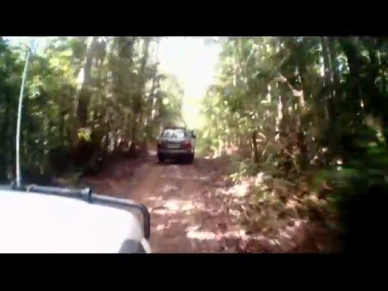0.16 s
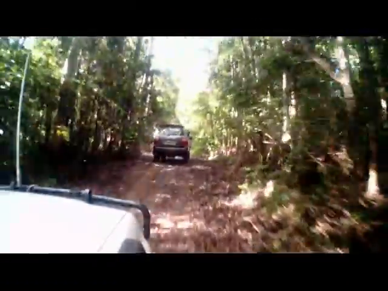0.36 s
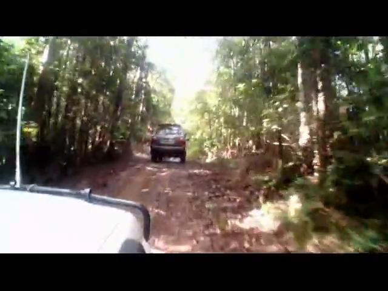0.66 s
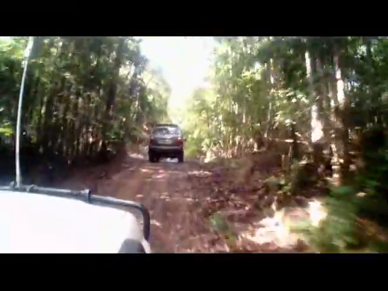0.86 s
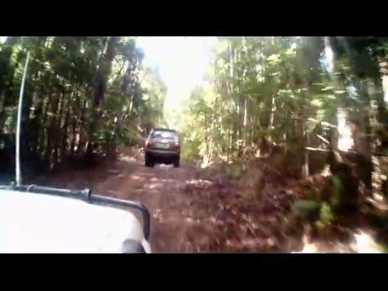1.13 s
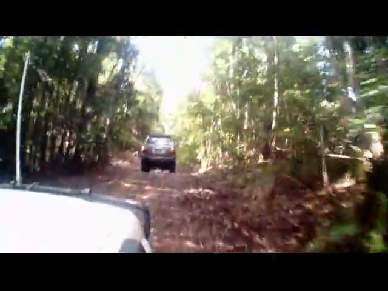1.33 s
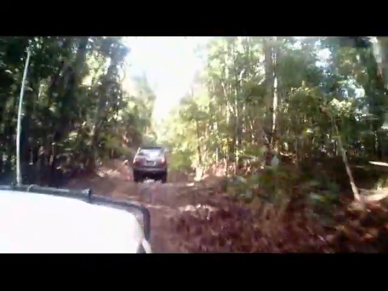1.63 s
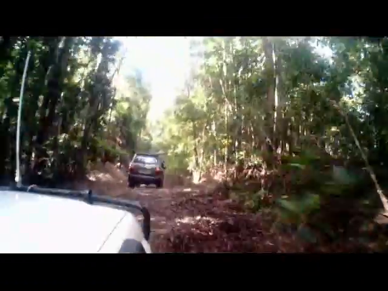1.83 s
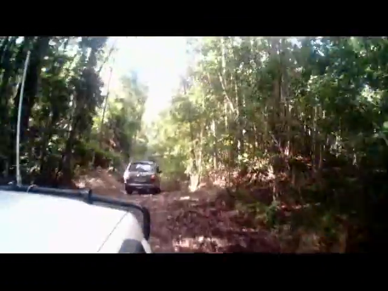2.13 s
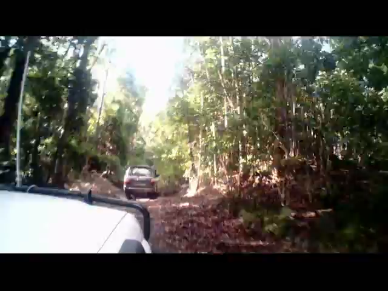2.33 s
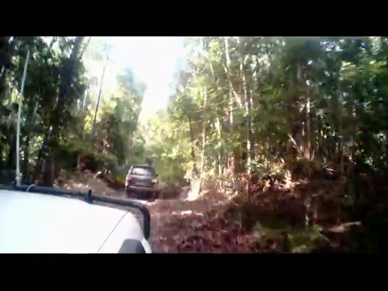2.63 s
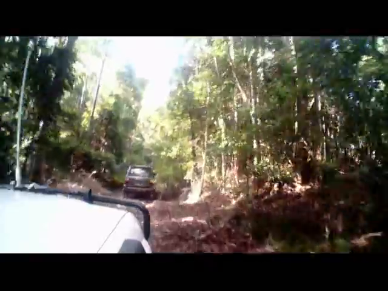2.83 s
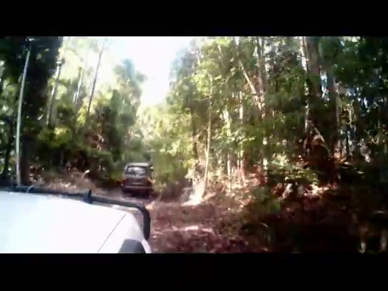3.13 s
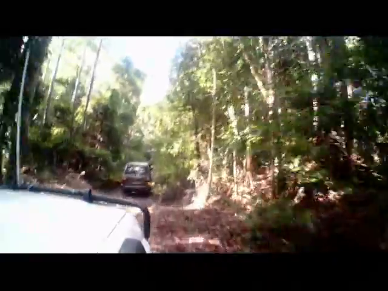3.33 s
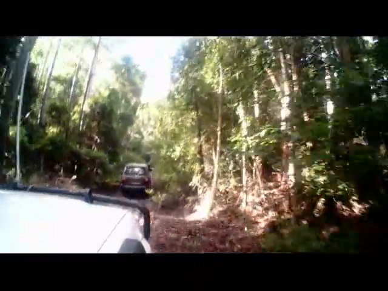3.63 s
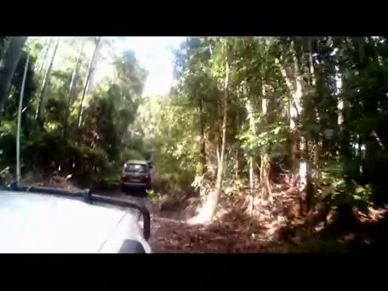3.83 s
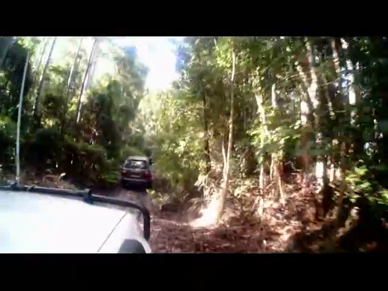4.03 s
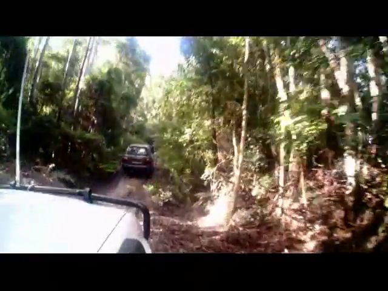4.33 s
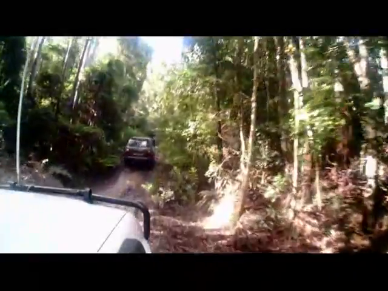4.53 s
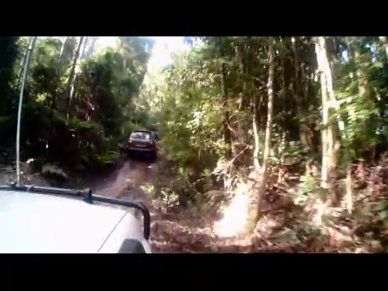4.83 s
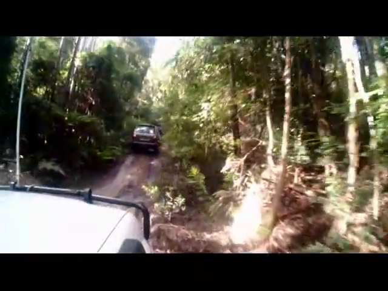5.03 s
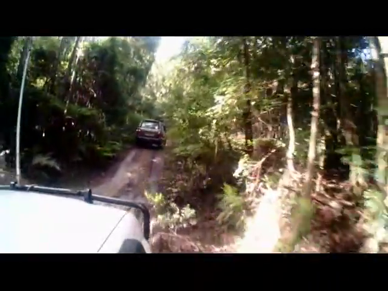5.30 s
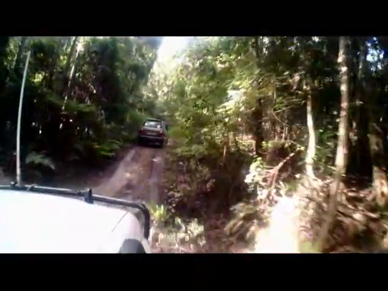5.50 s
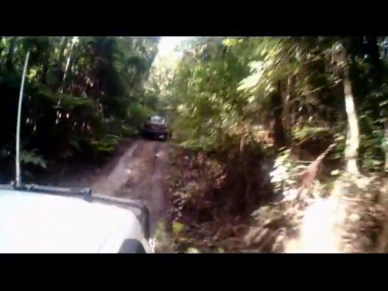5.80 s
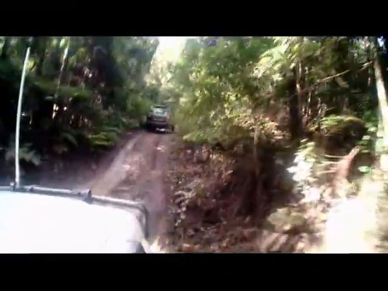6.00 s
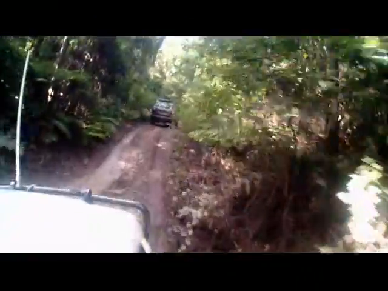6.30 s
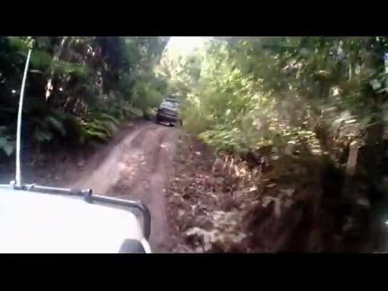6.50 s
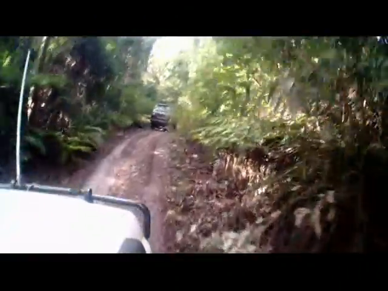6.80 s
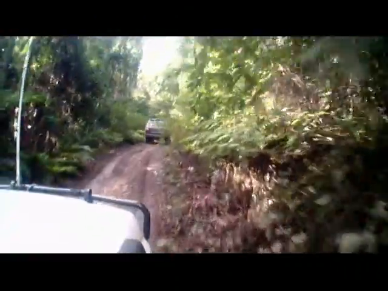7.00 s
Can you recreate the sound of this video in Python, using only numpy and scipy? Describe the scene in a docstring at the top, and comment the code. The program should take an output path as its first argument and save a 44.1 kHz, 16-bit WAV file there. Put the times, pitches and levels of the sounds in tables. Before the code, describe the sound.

Heard inside the cab of an off-road vehicle on a forest track, a low, booming engine hum sinks slowly while the tyres rumble underneath. Midway comes a cluster of clanks with a heavy thud, then a faint scrape of branches and another sharp metallic knock. The engine climbs back up under load, and a quick run of dry plastic taps rattles very close to the microphone to finish.

```python
"""An engine drones close ahead, heard from a camera microphone in the cab of a four-wheel drive climbing
a forest dirt track. It eases off, then pulls until its firing harmonics boom in the cab's air modes.
Below, tyres rumble and crunch on grit; ruts make loose metal clank and the body thud. Outside, leaves
and branches brush past, and near the end the plastic mount chatters right at the microphone."""
import sys
import numpy as np
from scipy.fft import rfft, irfft, next_fast_len
from scipy.io import wavfile
from scipy.ndimage import uniform_filter1d, map_coordinates

SR = 44100
rng = np.random.default_rng(int(sys.argv[2]) if len(sys.argv) > 2 else 0)


def waveform_to_disk(signal):
    """Save audio, clipped to [-1, 1], as 16-bit WAV at the path in sys.argv[1]."""
    frames = np.transpose(np.atleast_2d(signal))
    scaled = np.clip(frames, -1, 1) * 32767
    samples = np.round(scaled).astype(np.int16)
    wavfile.write(sys.argv[1], SR, samples)


N = 315315

# engine speed as firing rate: (t/s, f/Hz)
FIRING_RATE = [(0, 80.84), (.3, 78.57), (.6, 76.2), (1.1, 71.76), (1.35, 71.03), (1.6, 68.06),
               (2.05, 60.34), (2.5, 58.69), (2.9, 58.78), (3.25, 63.25), (3.65, 65.48), (4.4, 62.89),
               (5.1, 59.9), (5.7, 67.4), (5.95, 70.23), (6.13, 76.37), (6.2, 78.53), (6.5, 78.83),
               (7.15, 78.93)]
# engine load, which drives clatter, hiss, boom and the tyres' grip on the grit: (t/s, level/dB)
LOAD = [(0, 2), (.35, 2), (1.8, -0.8), (3.3, 0), (4.3, 1.64), (5.2, 1.73), (5.65, 2), (6.1, 2.5),
        (7.15, 2.5)]
# strength of the exhaust drone: (t/s, level/dB)
DRONE_LEVEL = [(0, -45), (.3, -47), (.6, -43.5), (1.1, -41.5), (1.55, -40), (1.9, -43.5), (2.2, -45.5),
               (2.5, -46), (2.8, -40), (3, -42.5), (3.2, -42.5), (3.6, -41.5), (4.1, -50.5), (5.05, -53),
               (5.5, -44), (5.95, -42.5), (6.21, -37), (6.26, -44.5), (6.29, -39.5), (6.57, -33),
               (6.72, -39), (6.92, -38), (7.15, -39)]
# exhaust harmonics; unequal cylinders add half orders: (multiple of the firing rate, level/dB)
EXHAUST_ORDERS = [(1, -3.5), (2, -0.5), (2.5, -10), (3, 1.5), (4, -16.5), (5.5, -15)]
# the cab's air modes, as heard at the microphone: (f/Hz, gain/dB)
CAB_RESPONSE = [(60, -12.5), (78, -10.5), (100, -5), (118, 1), (128, 2), (140, 4), (152, -11), (162, -8),
                (177, 6), (186, -6.5), (205, -13.5), (224, -12.5), (238, 9), (258, -2.5), (320, -13),
                (378, -4), (400, -11.5), (440, -22)]
# engine bay resonances: (f/Hz, width/Hz, gain/dB)
BAY_MODES = [(324, 18, -7.5), (466.3, 52.4, 2), (805, 32, -5), (903, 120, -6), (1065.5, 62.5, 4),
             (1120, 64, 1.5), (1330, 43, -23), (1740, 750, -17), (2097, 110, -11)]
# upper harmonics that sing in the bay: (multiple of the firing rate, level/dB)
SINGING_ORDERS = [(14, -23), (15, -23), (16, -24), (17, -24), (18, -20), (19, -24)]
# valve hiss spectrum: (f/Hz, level/dB)
HISS_SPECTRUM = [(900, -36), (1500, -3), (1900, -15.5), (2300, -4), (2800, -1), (3200, -1.5), (3650, -0.5),
                 (4170, -1), (4530, -4.5), (5000, -7.5), (5560, -13.5), (6900, -21), (7800, -57.5)]
# intake whistle, following the throttle: (t/s, level/dB)
INTAKE_LEVEL = [(0, -73), (.8, -68.5), (1.4, -72), (1.8, -76), (3.4, -76), (4.2, -68.5), (4.7, -64),
                (5.6, -64.5), (6.1, -65), (7.15, -65)]
# the intake's two whistling resonances: (f/Hz, level/dB)
INTAKE_SPECTRUM = [(2000, -42), (2520, -8.5), (2740, 1.5), (2980, -14.5), (3500, -28), (3900, -16),
                   (4150, -7.5), (4450, -18), (5200, -40.5)]
# alternator whine: (t/s, level/dB)
WHINE_LEVEL = [(0, -71.5), (.6, -71.5), (1.3, -71), (1.7, -73), (2.05, -72), (2.3, -81), (2.8, -73),
               (3.3, -77), (7.15, -72.5)]

# tyre rumble, following the roughness of the track: (t/s, level/dB)
RUMBLE_LEVEL = [(0, -29.5), (.4, -36), (.77, -30.5), (.96, -38), (1.21, -34), (1.33, -42.5), (1.5, -39.5),
                (1.9, -39.5), (2.08, -31), (2.4, -36.5), (2.89, -32.5), (3.4, -37), (3.9, -35.5),
                (4.6, -38), (5.3, -36), (5.65, -45), (6.58, -40.5), (7, -27.5), (7.15, -37.5)]
# its spectrum under the floor: (f/Hz, level/dB)
RUMBLE_SPECTRUM = [(12, -34), (22, -5), (32, 9), (38, 6), (45, -3), (53, -7), (63, -36.5), (100, -38),
                   (200, -78)]
# the cab's boom around the microphone: (f/Hz, level/dB)
BOOM_SPECTRUM = [(60, -24.5), (100, -13), (118, 0), (145, -3.5), (172, 0.5), (205, -3), (228, -3.5),
                 (252, -14.5), (272, -13), (330, -16.5), (480, -25.5), (600, -24.5), (1200, -64.5)]
# blows from ruts: (t/s, clank level/dB, thud level/dB, thud softness/dB lost per octave)
RUT_BLOWS = [ (3.519, -29.5, -29.5, 2), (3.546, -31, -31, 6), (3.575, -52, -27, 8), (3.635, -56, -23, 7),
             (3.7305, -33, -27, -2), (3.7405, -35, -17, 6), (3.7483, -36, -8.5, 17.5), (3.803, -33, -55, 2),
             (4.141, -31.5, -52, 6), (4.512, -61, -57, -5), (4.844, -33, -49, 2.5), (5.162, -16, -36.5, 9),
             (5.174, -29.5, -21.5, 1.5), (5.216, -19, -13.5, 2), (5.233, -34, -23, -1.5),
             (5.364, -34, -49, 6), (5.398, -32.5, -58, 5), (5.952, -36.5, -31, 3),
             (6.185, -30.5, -34, -1.5), (6.61, -28.5, -41, 4.5)]
# ring of loose metal: (f/Hz, level/dB, t60/s)
METAL_MODES = [(792, -19, 0.26), (881, -18, 0.13), (1126, -1.5, 0.043), (1130.5, 4, 0.049),
               (1386, -11.5, 0.036), (1530, -20.5, 0.054), (1847, -20.5, 0.031), (2050, -24.5, 0.098),
               (2460, -25.5, 0.029), (3700, -26.5, 0.026)]
# ring of the body shell: (f/Hz, level/dB, t60/s)
SHELL_MODES = [(127.1, -5.5, 0.16), (184.2, 1, 0.075), (225, -4.5, 0.14), (313.6, -2.5, 0.068),
               (399, -5, 0.077), (444.6, -6, 0.11), (793, -22.5, 0.08), (913, -6.5, 0.079)]
# rattle of small fittings: (f/Hz, level/dB)
FITTINGS_SPECTRUM = [(900, -28), (1250, 3), (1600, 4), (2100, -7.5), (2400, -14), (2750, -7.5), (3300, -27),
                     (4200, -17.5), (5000, -36), (7000, -55)]
# the camera mount's run of fading taps: (t/s, level/dB)
MOUNT_TAPS = [(6.646, -10), (6.705, -6.5), (6.7649, -8), (6.8271, -8), (6.8881, -11), (6.95, -14),
              (7.011, -17), (7.0723, -13), (7.133, -14.5)]
# ring of the plastic mount: (f/Hz, level/dB, t60/s)
MOUNT_MODES = [(170.2, -18, 0.1), (202, 2, 0.026), (496.7, -12, 0.02), (640, -16, 0.012),
               (875, -20.5, 0.03), (1080, -17.5, 0.025), (1550, -42, 0.0055), (1990, -23, 0.015),
               (3870, -36.5, 0.021)]
# click of each tap: (f/Hz, level/dB)
CLICK_SPECTRUM = [(250, -8.5), (500, 13.5), (1200, 0), (1700, -10), (2100, -11.5), (2500, -12.5),
                  (4100, -21), (5200, -23.5), (7000, -39)]

# grit under the tyres: (f/Hz, level/dB)
GRIT_SPECTRUM = [(500, -8.0), (900, 9.5), (1400, 5.0), (1750, -23.5), (2200, -13.5), (3000, -19.5),
                 (4500, -26.0), (7000, -43.0)]
# patches of loose stones: (t/s, level/dB)
STONE_PATCHES = [(3.55, -46), (4.67, -50), (5.39, -53), (6.15, -52)]
# twigs snap and stones tick: (t/s, level/dB, f/Hz)
SNAPS = [(2.83, -47, 2660), (2.866, -50.5, 4360), (3.518, -56, 1870), (3.546, -44, 1842),
         (3.638, -48, 2000), (4.256, -38, 1450), (4.545, -42, 1649), (4.647, -46, 1510), (5.470, -59, 4540)]
# branches along the body: (t/s, level/dB, half length/s)
BRANCH_SCRAPES = [(4.233, -67, .06), (4.664, -55, 0.026), (5.365, -55, .02)]
# their spectrum: (f/Hz, level/dB)
BRANCH_SPECTRUM = [(1000, -19), (1500, 3.5), (2100, -1.5), (2900, -6), (4200, -16.5), (7000, -32)]
# rustle of dry leaves: (t/s, level/dB)
LEAF_LEVEL = [(3.9, -78), (4.27, -49.5), (4.42, -57), (4.62, -61), (4.9, -85)]
# its spectrum: (f/Hz, level/dB)
LEAF_SPECTRUM = [(500, -4), (900, 4), (1500, -15), (2300, -6.5), (3000, -18), (5000, -24), (7000, -45.5)]
# bands the bulkhead swallows: (f/Hz, width/Hz, gain/dB)
BULKHEAD_DIPS = [(80, 110, -20), (580, 37, -12), (1265, 210, -7), (2285, 600, -6.5)]
# the camera's electrical buzz, all treble: (f/Hz, level/dB)
BUZZ_SPECTRUM = [(2500, -28.5), (4200, 4), (5200, 1.5), (6900, -11.5), (7800, -34.5)]

CLATTER_DB, HISS_DB, BOOM_DB, GRIT_DB = -45.5, -68.5, -41, -63  # at medium load
HISS_GROWTH, BOOM_GROWTH, GRIT_GROWTH = 0.57, 0.8, 5.3  # dB per dB of load
BRIGHTENING = 2.1  # dB per dB of load, for each order above the fourth
REBOUND_S, REBOUND_LOSS_DB = .033, 16  # every blow falls back once, more softly
TIME = np.arange(N) / SR


def engine():
    """Just ahead of the cab: drone, clatter, valve hiss, intake whistle and a faint alternator whine."""
    firing_hz, load_db = curve(FIRING_RATE), curve(LOAD)
    firings = np.cumsum(firing_hz * (1 + 0.0032 * wobble(14))) / SR
    beat_db = 0.5 * np.cos(2 * np.pi * firings)
    clatter = bay_clatter(firings, firing_hz, beat_db, load_db, sag=0.0099)
    valve_noise = amp(beat_db + wobble(60)) * rng.standard_normal(N)
    hiss = amp(HISS_DB + HISS_GROWTH * load_db) * coloured(valve_noise, HISS_SPECTRUM)
    intake_air = amp(beat_db) * rng.standard_normal(N)
    intake = amp(curve(INTAKE_LEVEL)) * coloured(intake_air, INTAKE_SPECTRUM)
    whine = alternator(firings, order=35.3)
    return drone(firings, firing_hz, load_db, waver_db=0.4) + clatter + hiss + intake + whine


def drone(firings, firing_hz, load_db, waver_db):
    """Low firing harmonics fill the cab as nearly clean tones, each swelling as it crosses an air mode."""
    drone_db, out = curve(DRONE_LEVEL), np.zeros(N)
    for order, order_db in EXHAUST_ORDERS:
        cab_db = np.interp(order * firing_hz, *np.transpose(CAB_RESPONSE))
        db = drone_db + order_db + cab_db + waver_db * wobble(18)
        db += BRIGHTENING * max(order - 4, 0) * load_db
        out += np.sqrt(2) * amp(db) * np.sin(2 * np.pi * (order * firings + rng.random()))
    return out


def bay_clatter(firings, firing_hz, beat_db, load_db, sag):
    """Rattle, upper harmonics and firing pulses ring in the engine bay, muffled by the bulkhead."""
    rattle = unit(amp(beat_db + wobble(45)) * rng.standard_normal(N))
    drive = rattle + singing(firings, firing_hz, centre_hz=1115, width_hz=120, waver=0.5)
    drive += 0.27 * combustion(firings, cylinder_db=2.5, scatter_db=5.0)
    # off load the clatter rings a little lower
    slack = np.clip(load_db / load_db.min(), 0, 1)
    slack_modes = [(hz * (1 - sag), width, db) for hz, width, db in BAY_MODES]
    ring = (1 - slack) * resonate(drive, BAY_MODES) + slack * resonate(drive, slack_modes)
    return lowpass(bulkhead(amp(CLATTER_DB + load_db) * ring), cutoff_hz=1550, poles=3)


def singing(firings, firing_hz, centre_hz, width_hz, waver):
    """Upper harmonics sing out as they cross the bay's main resonance, each wavering on its own."""
    out = np.zeros(N)
    for order, db in SINGING_ORDERS:
        nearness = bell(order * firing_hz, centre_hz, width_hz)
        unsteady = 1 + waver * (wobble(22) + 1j * wobble(22))
        tone = np.exp(2j * np.pi * (order * firings + rng.random()))
        out += amp(db) * nearness * np.real(unsteady * tone)
    return out


def combustion(firings, cylinder_db, scatter_db):
    """One pulse per firing; the four cylinders differ in strength."""
    at = np.flatnonzero(np.diff(np.floor(firings)))
    cylinder = np.resize(rng.standard_normal(4), len(at))
    pulses = np.zeros(N)
    pulses[at] = amp(cylinder_db * cylinder + scatter_db * rng.standard_normal(len(at)))
    return unit(pulses)


def alternator(firings, order):
    """The alternator's fan whines as a narrow band of noise that follows the shaft."""
    flutter = wobble(190) + 1j * wobble(190)
    whine = np.real(flutter * np.exp(2j * np.pi * order * firings))
    return amp(curve(WHINE_LEVEL) - 0.5) * unit(whine)


def road(jolts_per_s, hum_hz, hum_db):
    """Tyres shake the body from below; the cab booms around the microphone and one panel hums."""
    sway = coloured(rng.standard_normal(N), RUMBLE_SPECTRUM)
    # the heavy body keeps swinging, so the rumble is fairly even
    sway_power = np.abs(uniform_filter1d(sway ** 2, size=5000))
    sway = unit(sway / np.sqrt(sway_power + 0.69))
    boom_db = BOOM_DB + BOOM_GROWTH * curve(LOAD) + 0.87 * wobble(jolts_per_s)
    boom = amp(boom_db) * coloured(rng.standard_normal(N), BOOM_SPECTRUM)
    hum_phase = 2 * np.pi * hum_hz * TIME + 0.63 * wobble(22)
    hum = amp(hum_db + 1.8 * wobble(21)) * np.sin(hum_phase)
    rumble_db = curve(RUMBLE_LEVEL) - 1.5 * wobble(jolts_per_s)  # swells and sinks from bump to bump
    return amp(rumble_db) * sway + boom + hum


def knocks(crack_db, crack_t60):
    """Each rut clanks loose metal with a brief crack and thuds through the body shell, then rebounds."""
    rings, cracks, t = np.zeros(N), np.zeros(N), np.arange(SR // 3) / SR
    rebounds = [(s + REBOUND_S, clank_db - REBOUND_LOSS_DB, thud_db - REBOUND_LOSS_DB, softness)
                for s, clank_db, thud_db, softness in RUT_BLOWS]
    for s, clank_db, thud_db, softness in RUT_BLOWS + rebounds:
        add(rings, s, amp(clank_db) * strike(METAL_MODES, attack_s=0.0027, scatter_db=1.5))
        # softer blows reach mainly the lowest modes of the shell
        shell = [(hz, db - softness * np.log2(hz / SHELL_MODES[0][0]), t60)
                 for hz, db, t60 in SHELL_MODES]
        add(rings, s, amp(thud_db) * strike(shell, attack_s=0.0026, scatter_db=1.0))
        add(cracks, s, amp(clank_db + crack_db - 60 * t / crack_t60) * rng.standard_normal(len(t)))
    return rings + lowpass(cracks, cutoff_hz=4000, poles=10)


def mount(click_db, click_t60):
    """Right at the microphone, each tap is a short, damped swing of the camera with a dry plastic click."""
    swings, clicks, t = np.zeros(N), np.zeros(N), np.arange(SR // 10) / SR
    for s, db in MOUNT_TAPS:
        add(swings, s, amp(db) * strike(MOUNT_MODES, attack_s=0.002, scatter_db=1.0))
        add(clicks, s, amp(db + click_db - 60 * t / click_t60) * (1 - np.exp(-t / 0.0015)))
    taps = swings + clicks * coloured(rng.standard_normal(N), CLICK_SPECTRUM)
    # the light mount carries no deep bass
    return filtered(taps, lambda hz: 1 / np.sqrt(1 + (150 / (hz + 1)) ** 8))


def fittings(shake_db, rise_s):
    """Every thud shakes small loose fittings into a brief rattle that swells and dies."""
    shake, age = np.zeros(N), np.arange(SR // 4) / SR / rise_s
    for s, _, thud_db, softness in RUT_BLOWS:
        add(shake, s, amp(thud_db - softness + shake_db) * age * np.exp(1 - age))
    return shake * coloured(grains(per_s=1200), FITTINGS_SPECTRUM)


def grit(patch_half_s):
    """Down at the tyres grit crunches in clumps, more on stony patches; twigs snap and stones tick."""
    patches = sum(amp(db) * bell(TIME, s, patch_half_s) for s, db in STONE_PATCHES)
    crunch = amp(GRIT_DB + GRIT_GROWTH * curve(LOAD)) + patches
    clumps = grains(per_s=1500) * amp(1.9 * wobble(35))
    out = crunch * coloured(clumps, GRIT_SPECTRUM)
    for s, db, hz in SNAPS:
        modes = [(hz, 0, .015), (0.98 * hz, -10, .01)]
        add(out, s, amp(db) * strike(modes, attack_s=0.00046, scatter_db=3.5))
    return out


def branches():
    """Just outside, each branch drags over the paint as a short swell of dense, bright grains."""
    contact = sum(amp(db) * bell(TIME, s, half_s) for s, db, half_s in BRANCH_SCRAPES)
    return contact * coloured(grains(per_s=2500), BRANCH_SPECTRUM)


def leaves(flicker_db):
    """A soft, grainy rustle swells and fades as the vehicle runs through dry leaves."""
    level = amp(curve(LEAF_LEVEL))
    rustle = grains(per_s=4000) * amp(flicker_db * wobble(58))
    return (level - level.min()) * coloured(rustle, LEAF_SPECTRUM)


def buzz(hz, level_db, tick_s, second_tick_db):
    """A faint steady buzz in the camera's electronics: two unequal ticks per cycle."""
    half_cycles = 2 * hz * TIME
    age_s = half_cycles % 1 / (2 * hz)
    ticks = np.exp(-age_s / tick_s) * amp(second_tick_db * (np.floor(half_cycles) % 2))
    return amp(level_db) * coloured(ticks * rng.standard_normal(N), BUZZ_SPECTRUM)


def bulkhead(x):
    """Sounds from outside pass the bulkhead's antiresonances on their way to the microphone."""
    return filtered(x, lambda f: np.prod(
        [1 + (amp(db) - 1) * resonance(f, hz, width) for hz, width, db in BULKHEAD_DIPS], axis=0))


def strike(modes, attack_s, scatter_db):
    """One blow: every mode rings at a slightly new strength and pitch."""
    t = np.arange(SR // 3) / SR
    ring = np.zeros(len(t))
    for hz, db, t60 in modes:
        decay = amp(db + scatter_db * rng.normal() - 60 * t / t60)
        ring += decay * np.sin(2 * np.pi * hz * (1 + 0.0076 * rng.normal()) * t)
    return ring * (1 - np.exp(-t / attack_s))


def grains(per_s):
    """Tiny contacts of random timing and strength."""
    return (rng.random(N) < per_s / SR) * rng.standard_normal(N)


def resonance(f, hz, width):
    """Complex response of one mode, 1 at its centre."""
    return 1j * f * width / (hz * hz - f * f + 1j * f * width)


def resonate(x, modes):
    """x through (f/Hz, width/Hz, gain/dB) resonances, at rms 1."""
    return unit(filtered(x, lambda f: sum(amp(db) * resonance(f, hz, width) for hz, width, db in modes)))


def coloured(x, spectrum):
    """x shaped by (f/Hz, level/dB) points, at rms 1."""
    f, db = np.transpose(spectrum)
    return unit(filtered(x, lambda hz: amp(np.interp(np.log(hz + 1), np.log(f), db))))


def lowpass(x, cutoff_hz, poles):
    """Roll off the treble by 6 dB per octave per pole."""
    return filtered(x, lambda hz: 1 / np.sqrt(1 + (hz / cutoff_hz) ** (2 * poles)))


def filtered(x, response):
    """x through a complex frequency response."""
    size = next_fast_len(N + SR // 2)
    return irfft(rfft(x, size) * response(np.fft.rfftfreq(size, 1 / SR)), size)[:N]


def wobble(rate):
    """A smooth random curve, rate knots a second."""
    return map_coordinates(rng.standard_normal(int(N * rate / SR) + 4), [np.arange(N) * rate / SR])


def curve(rows):
    """One value per sample from (t/s, value) points."""
    return np.interp(TIME, *np.transpose(rows))


def bell(x, centre, half_width):
    """A smooth hump, 1 at its centre."""
    return np.exp(-((x - centre) / half_width) ** 2)


def add(track, s, sound):
    """Mix a sound into a track at time s."""
    start = max(round(s * SR), 0)
    track[start:start + len(sound)] += sound[:N - start]


def amp(db):
    """Decibels to gain."""
    return 10 ** (np.asarray(db) / 20)


def unit(x):
    """Scale to rms 1."""
    return x / np.sqrt(np.mean(x ** 2) + 1e-20)


def scene():
    """Everything as it arrives at the one microphone in the cab."""
    outside = knocks(crack_db=-26, crack_t60=0.045) + fittings(shake_db=-31, rise_s=0.01)
    outside += grit(patch_half_s=0.035) + branches() + leaves(flicker_db=-0.5)
    cab = engine() + road(jolts_per_s=12, hum_hz=243.1, hum_db=-39)
    return (cab + bulkhead(outside) + mount(click_db=-21, click_t60=0.03))[None]


def record(dry):
    """The camera adds a trace of buzz and keeps nothing above its band limit."""
    heard = dry[0] + buzz(hz=57.6, level_db=-80, tick_s=0.00025, second_tick_db=-9.0)
    return lowpass(heard, cutoff_hz=7100, poles=40)[None]


dry = scene()
out = record(dry)
waveform_to_disk(out)
```